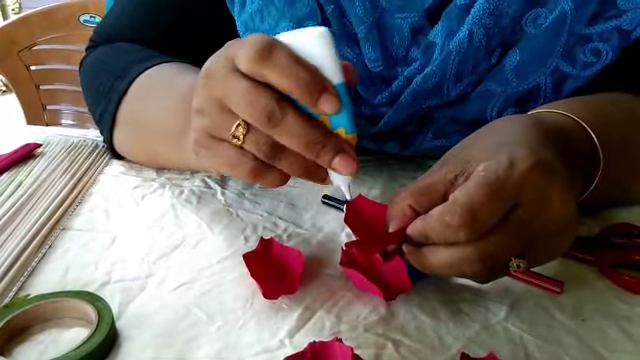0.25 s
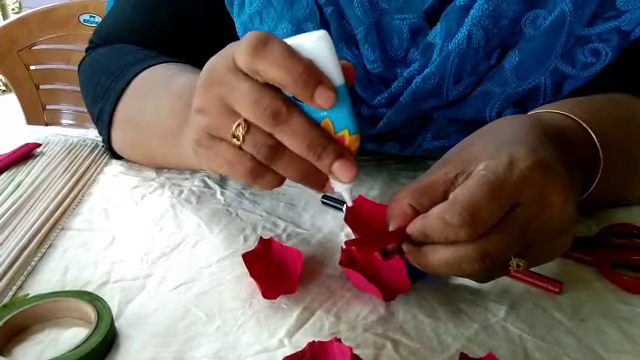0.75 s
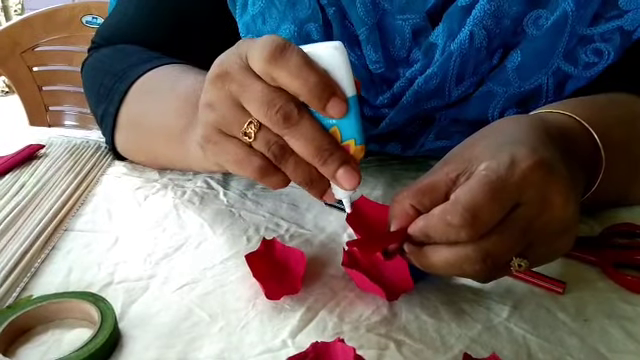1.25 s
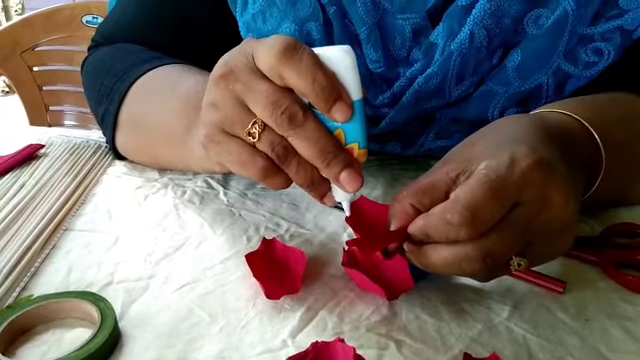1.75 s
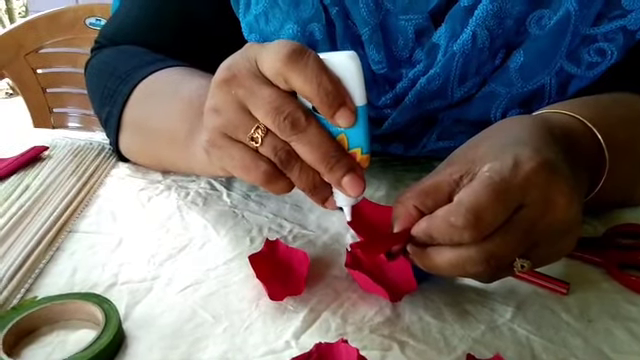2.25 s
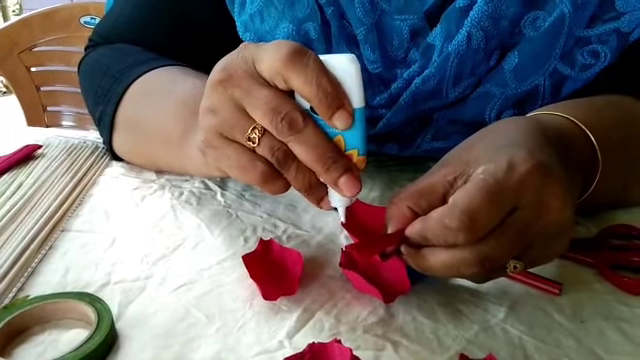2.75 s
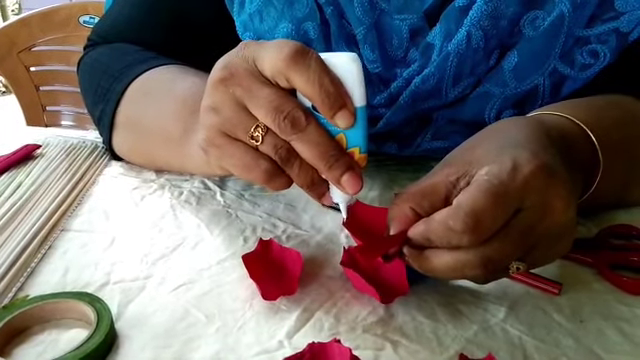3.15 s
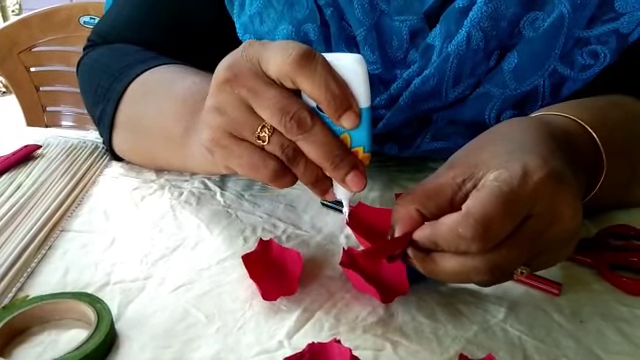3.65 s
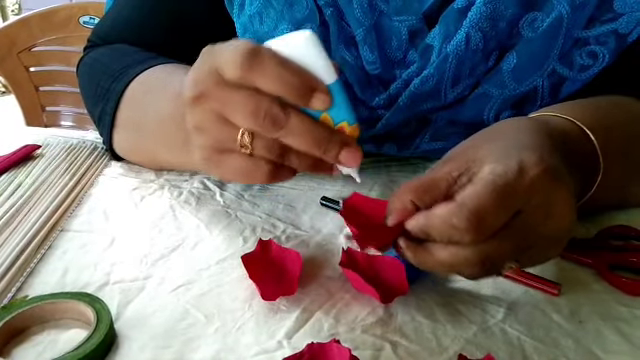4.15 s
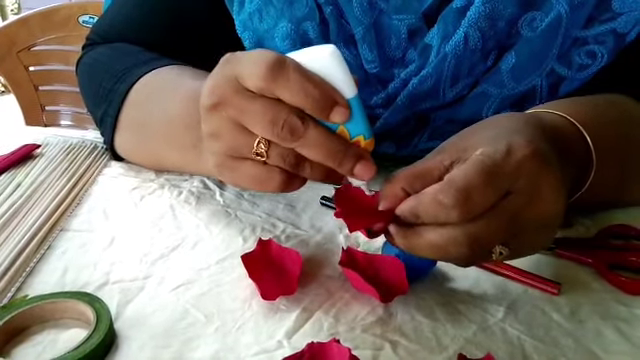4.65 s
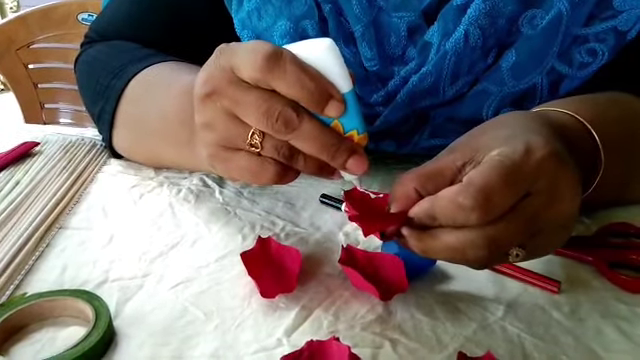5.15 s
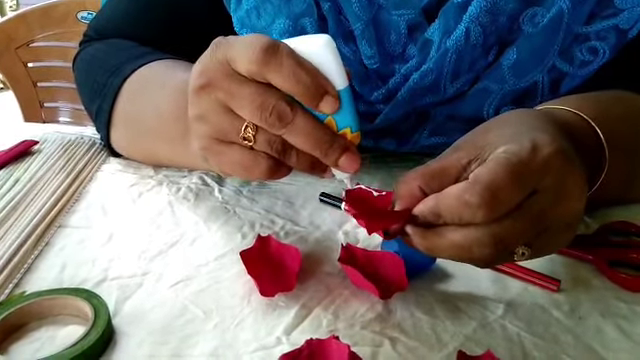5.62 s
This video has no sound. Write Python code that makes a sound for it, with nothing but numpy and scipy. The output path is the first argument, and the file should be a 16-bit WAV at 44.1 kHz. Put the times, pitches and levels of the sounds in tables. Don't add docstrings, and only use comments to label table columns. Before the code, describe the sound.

For almost six seconds a generator outside holds a steady low hum, strongest around 150 hertz with higher harmonics. Distant traffic adds fuzzy, wavering low drones and faint squeals or horn-like tones, mostly around 3 to 4.5 seconds and again near 5.7. Very high insects near 11 kilohertz shrill throughout: the nearest sings half-second phrases of three sinking notes, others overlap farther off, with a thin fast trill and a swelling blurred chorus. Soft air hiss and a tiny 60-per-second screen tick with a faint high whine lie underneath. Close to the phone microphone, paper petals snap dryly: small clicks at the start, sharp ones at 0.21 and 0.46, lighter ones between and at 0.83 and 1.33, then 1.5, a strong one at 1.62, a faint one at 2.03 and a last at 2.28. Barely audible tube taps fall near 0.08 and 1.57. The room tail is very short; afterwards only the background remains.

```python
import sys
import numpy as np
from scipy import signal
from scipy.fft import rfft, irfft
from scipy.io import wavfile
from scipy.ndimage import uniform_filter1d

SR = 44100
rng = np.random.default_rng(int(sys.argv[2]) if len(sys.argv) > 2 else 0)


def log_audio(samples):
    frames = np.atleast_2d(samples).T
    limited = np.clip(frames, -1, 1)
    pcm = np.round(limited * 32767).astype(np.int16)
    wavfile.write(sys.argv[1], SR, pcm)


def nominal_scale(level):
    x = np.asarray(level, float) / 20
    return 10 ** x


N = 259308

SHAFT_HZ = 24.9322
# (multiple of the shaft speed, level [dB])
SHAFT_ORDERS = [(5, -71.4), (6, -46.3), (7, -62.2), (8, -55.0), (9, -53.2), (10, -59.1), (11, -69.0),
                (12, -71.7), (14, -65.4), (15, -67.6), (16, -50.4), (17, -67.8), (18, -57.8), (19, -71.5),
                (20, -54.7), (21, -68.7), (22, -53.8), (26, -60.4), (27, -69.3), (28, -67.3), (30, -63.3),
                (32, -70.1), (34, -58.0), (35, -68.2), (36, -58.0), (37, -71.1), (38, -57.9), (40, -72.3),
                (42, -66.6)]

# (time [s], pitch [Hz], level [dB])
LOW_DRONE = [(0, 51.7, -54), (.7, 52, -56), (1.5, 52.7, -52), (2.7, 53.5, -48), (3.25, 53, -56),
             (3.4, 54, -55), (3.55, 54, -46), (3.8, 52, -57), (4.05, 51, -53), (4.3, 49.5, -57),
             (4.6, 50.5, -53), (4.8, 51, -60), (5.05, 50, -52), (5.5, 49, -61), (5.88, 49, -59)]
HIGH_DRONE = [(0, 68, -62), (1.2, 64, -65), (1.8, 61.7, -56), (2.15, 64, -60), (2.73, 67.4, -47.5),
              (3, 67.5, -56), (3.3, 68, -53), (3.55, 68.7, -59), (3.85, 69.2, -49), (4.3, 69.5, -57),
              (4.7, 70, -50), (5, 69.5, -57), (5.55, 69.4, -49.5), (5.88, 69.5, -53)]
# (time [s], length [s], pitch [Hz], level [dB])
FAR_TONES = [(3.08, .16, 868, -56), (3.28, .2, 872, -58), (2.9, .14, 880, -61), (5.64, .13, 808, -54),
             (5.78, .16, 808, -54), (3.93, .4, 2912, -62), (3.92, .26, 3340, -69), (3.35, .45, 2900, -71),
             (3.45, .3, 3320, -74), (4.08, .14, 650, -59), (.2, .25, 352, -60), (4.09, .12, 710, -61),
             (3.45, .25, 1160, -68), (1.83, .15, 1050, -63), (5.65, .3, 650, -62), (4.3, .25, 2900, -70)]

# (frequency [Hz], density [dB per Hz])
AIR_COLOUR = [(25, 7), (38, 8.5), (75, 3.5), (105, -2), (300, -1), (550, -4), (900, -5), (1500, -9.5),
              (2200, -15.5), (4500, -26), (9500, -17), (11500, -18), (12500, -29), (15500, -35.5)]
AIR_DB = -50.5

# (partial, carrier [dB], side lines [dB])
NEAR_WING = [(1, -8, -27), (2, -21, -27), (3, -20, -26), (4, 0, -14)]
# (partial, carrier [dB], side lines [dB])
FAR_WING = [(1, -7, -26), (2, -19, -26), (3, -12, -24), (4, 0, -12)]
BEAT_HZ = 296
# (time [s], length [s], top pitch of the 4th partial [Hz], level [dB], last step against the middle [dB])
PHRASES = [(-.13, .49, 11165, -54.5, 0), (.375, .49, 11185, -54, -7), (.878, .49, 11190, -54.5, -1.5),
           (1.39, .47, 11190, -53.5, 0), (1.87, .41, 11215, -54.5, 4), (2.285, .45, 11245, -53.5, 0),
           (2.745, .54, 11250, -53.5, 0), (3.278, .53, 11220, -53, 0), (3.81, .51, 11205, -57, 4),
           (4.306, .5, 11210, -54, -3.5), (4.82, .49, 11205, -53.5, -2), (5.31, .48, 11205, -57.5, 0),
           (5.8, .5, 11215, -54, 0)]
# (start [share], length [share], part of the whole fall [share], level [dB])
STEPS = [
    (0, .25, 0, -3.5),
    (.27, .34, .58, 0),
    (.61, .38, 1, 0),
]
FALL_HZ_PER_S, GLIDE_HZ_PER_S = 410, -210
# (first time [s], length [s], top pitch [Hz], level [dB])
NEIGHBOURS = [(.17, .46, 10790, -58), (.02, .53, 10700, -58.5)]
SWAY_HZ, SWAY_DB = 60.2, 2.5
# (centre [Hz], width [Hz], level [dB])
CHORUS_BANDS = [(2718, 237, -61.5), (3066, 680, -73), (5510, 480, -74), (7470, 780, -95),
                (10430, 790, -58.5), (11020, 450, -61.5)]
TRILL_HZ, TRILL_S, TRILL_PERIOD_S = 9400, .036, .0782

FRAME_HZ, FRAME_START, LINES_PER_FRAME = 59.945, .843, 233

# (time [s], peak [dB], fold ring [Hz], its width [Hz], hollow petal ring [dB])
SNAPS = [(0.0271, -28, 8550, 1990, -14), (0.058, -29, 7900, 2210, -18), (.21347, -9.5, 9000, 3300, -19),
         (.21401, -13, 9300, 3000, -19), (0.3792, -25, 7550, 4000, 9), (0.4077, -31, 8750, 2500, -10),
         (.4131, -25.5, 8640, 2500, -25), (.45655, -9.5, 8900, 950, -17), (.457, -28, 3100, 1100, -13),
         (0.4836, -31.5, 3440, 1200, -17), (0.491, -25, 7500, 4000, 2), (0.522, -32, 7440, 2000, -16),
         (0.5328, -29, 6500, 4500, -8), (0.8315, -28.5, 7500, 4000, 2), (1.333, -33, 7560, 4000, -3),
         (1.434, -41, 4970, 4000, -11), (1.4998, -21.5, 9320, 2200, -21), (1.62334, -12.5, 8200, 3200, -30),
         (1.6237, -17, 5200, 1200, -30), (2.0299, -31, 7200, 2000, -25), (2.2775, -16, 9100, 1500, -12)]
# (centre [Hz], width [Hz])
PAPER_RINGS = [
    (2750, 500),
    (5000, 4000),
]
BOUNCE = 0.033
# (time [s], ring [Hz], width [Hz], peak [dB])
TAPS = [(.078, 2050, 160, -42), (1.566, 1880, 170, -38)]

TOP_HZ = 15550


def evened(x):
    return x / np.sqrt(np.mean(x ** 2) + 1e-20)


def add(mix, s, sound):
    part = mix[round(s * SR):][:len(sound)]
    part += sound[:len(part)]


def drift(n, rate_hz):
    steps = rng.standard_normal(int(n / SR * 400) + 2)
    smooth = signal.lfilter([1], [1, -np.exp(-2 * np.pi * rate_hz / 400)], steps)
    return np.interp(np.arange(n) * 400 / SR, np.arange(len(steps)), evened(smooth - smooth.mean()))


def generator():
    turns = SHAFT_HZ * np.arange(N) / SR
    out = np.zeros(N)
    for order, db in SHAFT_ORDERS:
        out += np.sqrt(2) * nominal_scale(db) * np.cos(2 * np.pi * (order * turns + rng.random()))
    return out


def traffic():
    t = np.arange(N) / SR
    out = np.zeros(N)
    for drone in (LOW_DRONE, HIGH_DRONE):
        s, hz, level_db = np.transpose(drone)
        turns = np.cumsum(np.interp(t, s, hz) * (1 + 0.012 * drift(N, 2.5))) / SR
        level = nominal_scale(np.interp(t, s, level_db) + 2.6 * drift(N, 4.3))
        out += np.sqrt(2) * level * np.cos(2 * np.pi * turns)
    for s, length, hz, db in FAR_TONES:
        n = round(length * SR)
        turns = np.cumsum(hz * (1 + .006 * drift(n, 8.))) / SR
        level = nominal_scale(db + 2.5 + 2 * drift(n, 27)) * signal.windows.tukey(n, .5)
        add(out, s, np.sqrt(2) * level * np.cos(2 * np.pi * turns))
    return out


def air():
    frames, hz = N // 512 + 5, np.fft.rfftfreq(2048, 1 / SR)
    real, imaginary, patches = rng.standard_normal((3, len(hz), frames))
    patches = evened(uniform_filter1d(uniform_filter1d(patches, 12, 0), 8, 1))
    f, db = np.transpose(AIR_COLOUR)
    colour_db = np.interp(np.log(hz + 1), np.log(f), db)
    spectra = (real + 1j * imaginary) * nominal_scale(colour_db[:, None] + 1.35 * patches)
    noise = signal.istft(spectra, nperseg=2048, noverlap=1536)[1][:N]
    return nominal_scale(AIR_DB) * evened(noise)


def phrase(start, length, top_hz, db, last_db):
    rows = []
    for a, b, fall, step_db in STEPS:
        s = start + a * length
        hz = top_hz - fall * FALL_HZ_PER_S * length
        if 0 <= s < N / SR:
            rows.append((s, b * length, hz, db + step_db + last_db * (fall == 1)))
    return rows


def note(length, hz, glide, db, wing, rough_db):
    t = np.arange(round(length * SR)) / SR
    turns = np.cumsum((hz + glide * t) / 4 * (1 + .0006 * drift(len(t), 30.))) / SR
    beat = np.cos(2 * np.pi * (BEAT_HZ * hz / 11000 * t + rng.random()))
    tone = np.zeros(len(t))
    for partial, carrier_db, side_db in wing:
        tone += (nominal_scale(carrier_db) + 2 * nominal_scale(side_db) * beat) * np.cos(2 * np.pi * partial * turns)
    level = nominal_scale(db + rough_db * drift(len(t), 30.0)) * signal.windows.tukey(len(t), .35)
    return np.sqrt(2) * level * tone


def nearest_insect():
    out = np.zeros(N)
    for row in PHRASES:
        for s, length, hz, db in phrase(*row):
            add(out, s, note(length, hz, GLIDE_HZ_PER_S, db + 0.22, NEAR_WING, rough_db=1.5))
    return out


def neighbours():
    out = np.zeros(N)
    for first, period, top_hz, level_db in NEIGHBOURS:
        for k, (high, *loud) in enumerate(rng.uniform(-1, 1, (14, 4))):
            steps = phrase(first + k * period, period, top_hz + SWAY_HZ * high, level_db, 0)
            for (s, length, hz, db), u in zip(steps, loud):
                add(out, s, note(length, hz, GLIDE_HZ_PER_S, db + SWAY_DB * u, FAR_WING, rough_db=2))
    return out


def crowd():
    out = np.zeros(N)
    for when, long, high, loud in rng.random((130, 4)):
        chirp = note(.07 + .12 * long, 10300 + 600 * high, -200, -70 + 7 * loud, FAR_WING, rough_db=2.5)
        add(out, when * N / SR, chirp)
    return out


def resonate(x, hz, width):
    turn = np.exp(2j * np.pi * hz * np.arange(len(x)) / SR)
    r = np.exp(-np.pi * width / SR)
    return 2 * (turn * signal.lfilter([1 - r], [1, -r], x / turn)).real


def chorus():
    out = np.zeros(N)
    for hz, width, db in CHORUS_BANDS:
        band = rng.standard_normal(N)
        for _ in range(3):
            band = resonate(band, hz, width)
        out += nominal_scale(db + 3.05 * drift(N, 2.3)) * evened(band)
    return out


def trill():
    cycle = ((np.arange(N) / SR - TRILL_S) / TRILL_PERIOD_S + .5) % 1 - .5
    turns = np.cumsum(TRILL_HZ * (1 - 0.033 * cycle + 0.00204 * drift(N, 38.0))) / SR
    pulse = np.exp(-(cycle / .12) ** 2)
    return nominal_scale(-60 + 2 * drift(N, 3.)) * np.cos(2 * np.pi * turns) * pulse


def insects():
    return nearest_insect() + neighbours() + crowd() + chorus() + trill()


def low_pass(x, edge_hz, order):
    return signal.sosfilt(signal.butter(order, edge_hz, fs=SR, output="sos"), x)


def screen():
    turns = FRAME_HZ * np.arange(N) / SR - FRAME_START
    ms = ((turns + .5) % 1 - .5) * 1000 / FRAME_HZ
    end = ms - .84
    dip = .5 * (np.tanh(end / 0.021) - np.tanh((ms - .06) / 0.058))
    sag = signal.lfilter([1, -1], [1, -.988], dip)
    first_ring = np.exp(-((ms - .05) / 0.19) ** 2) * np.cos(2 * np.pi * 10.0 * (ms + 0.051))
    last_ring = np.exp(-(end / 0.047) ** 2) * np.sin(2 * np.pi * 9.4 * end)
    size = nominal_scale(1.5 * drift(N, 20.))
    whine = np.cos(2 * np.pi * LINES_PER_FRAME * turns)
    ticks = nominal_scale(-47) * sag + size * (nominal_scale(-43.5) * first_ring + nominal_scale(-37.5) * last_ring)
    return low_pass(ticks, 10500, order=4) + nominal_scale(-80.5) * whine


def causal(db):
    log_gain = np.log(nominal_scale(np.r_[db, db[-2:0:-1]]))
    return np.fft.ifft(np.exp(np.conj(signal.hilbert(log_gain)))).real[:300]


def petals():
    out, t, f = np.zeros(N), np.arange(600) / SR, np.fft.rfftfreq(1024, 1 / SR)
    hollow, sheet = (1 / (1 + (2 * (f - hz) / width) ** 2) ** 2 for hz, width in PAPER_RINGS)
    edges = 1 / (1 + (2000 / (f + 1)) ** 6) / (1 + (f / 13000) ** 22)
    for s, peak_db, hz, width, hollow_db in SNAPS:
        kick = .1 * rng.standard_normal(len(t)) * np.exp(-t / .0012)
        kick[[0, 25]] += 1, BOUNCE
        fold = 1 / (1 + ((f - hz) / width) ** 2) ** 2
        power = (fold + nominal_scale(-41) * sheet + nominal_scale(2 * hollow_db + 11.5) * hollow) * edges
        snap = np.convolve(kick, causal(10 * np.log10(power + 1e-9)))
        add(out, s, nominal_scale(peak_db) * snap / abs(snap).max())
    for s, hz, width, db in TAPS:
        add(out, s, nominal_scale(db) * np.exp(-np.pi * width * t) * np.sin(2 * np.pi * hz * t))
    return out


def room(x):
    t = np.arange(SR // 5) / SR
    tail = rng.standard_normal(len(t)) * nominal_scale(-60 * t / 0.067) * (t > .004)
    return signal.fftconvolve(x, tail / np.linalg.norm(tail))[:N]


def scene():
    snaps = petals()
    tail = nominal_scale(-24) * room(snaps)
    steady = rfft(generator() + traffic() + air() + insects() + screen() + tail)
    steady[round(TOP_HZ * N / SR):] = 0
    hz = np.arange(len(steady)) * SR / N
    steady /= 1 + (33 / (hz + 1)) ** 4
    return (irfft(steady, N) + snaps)[None]


def top_cut(x):
    return signal.sosfilt(signal.butter(12, 16480, fs=SR, output="sos"), x)


def record(dry):
    rise = np.minimum(0.81 + np.arange(N) / SR / 0.055, 1)
    return top_cut(dry * rise)


dry = scene()
out = record(dry)
log_audio(out)
```